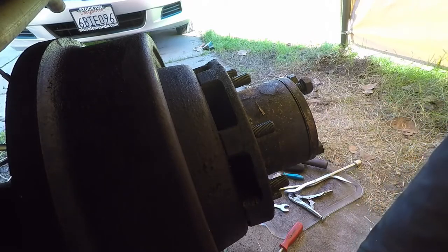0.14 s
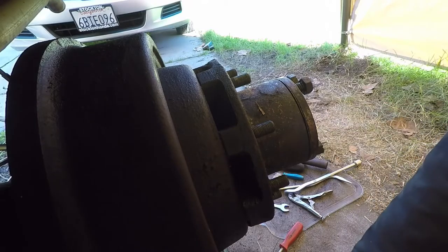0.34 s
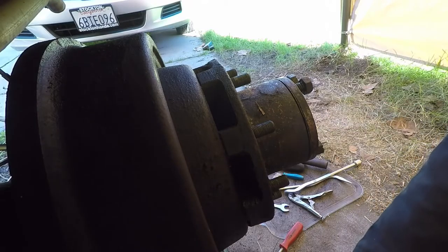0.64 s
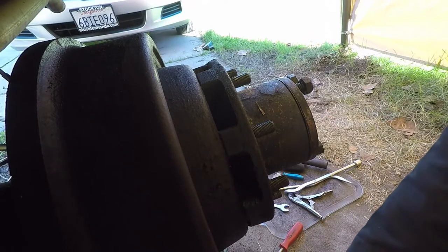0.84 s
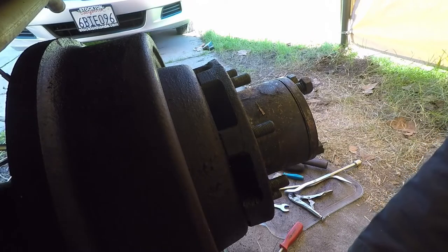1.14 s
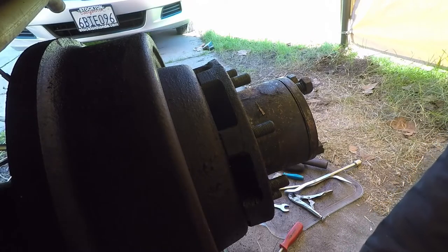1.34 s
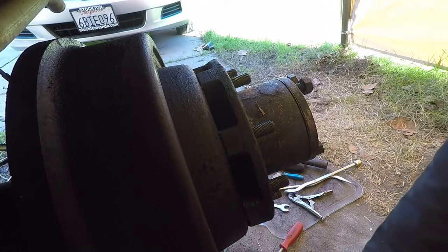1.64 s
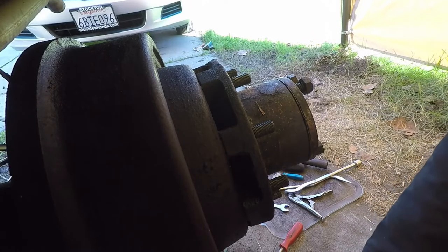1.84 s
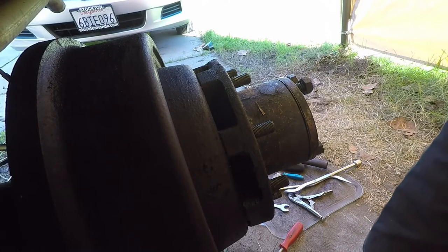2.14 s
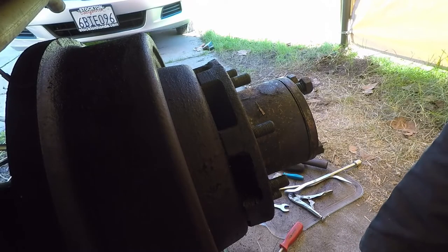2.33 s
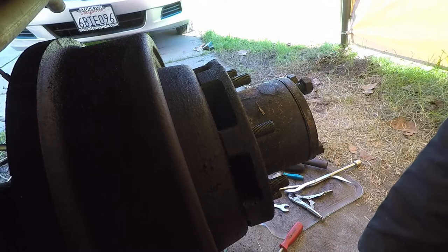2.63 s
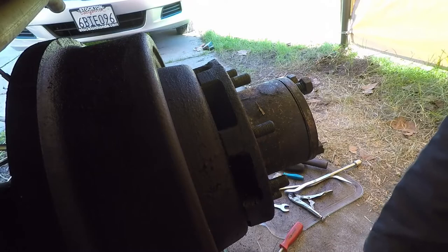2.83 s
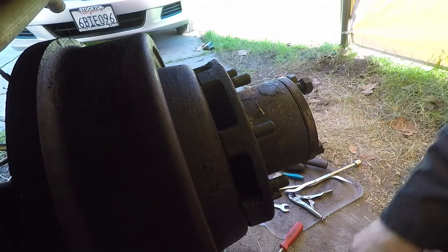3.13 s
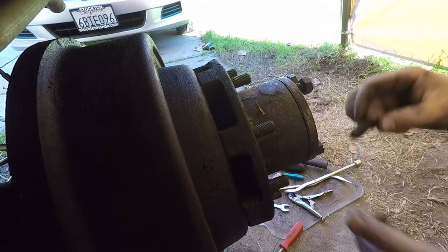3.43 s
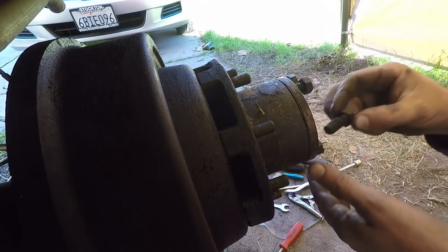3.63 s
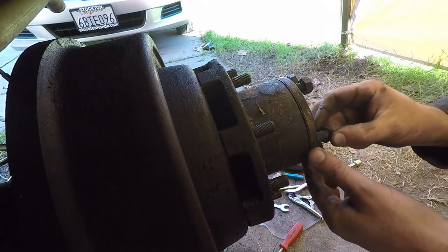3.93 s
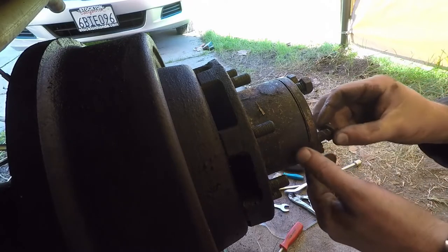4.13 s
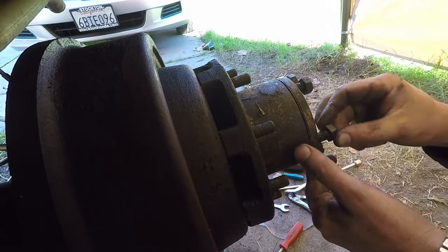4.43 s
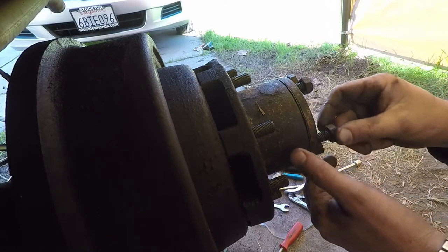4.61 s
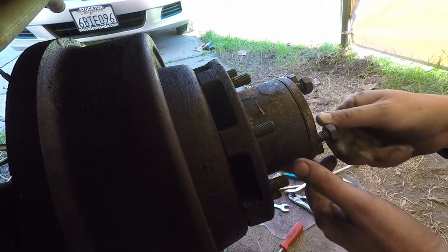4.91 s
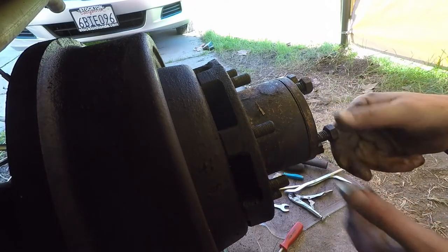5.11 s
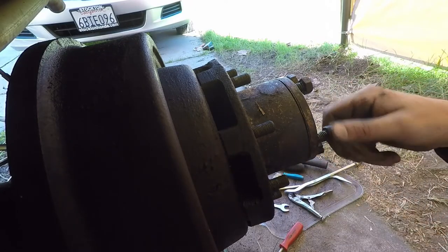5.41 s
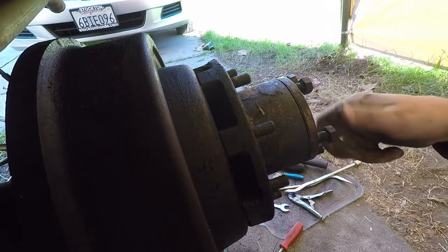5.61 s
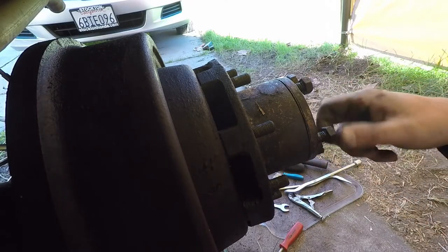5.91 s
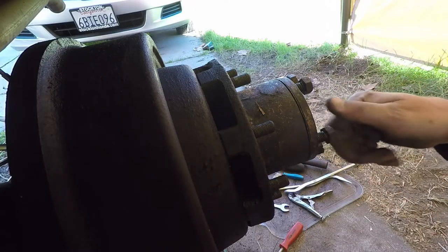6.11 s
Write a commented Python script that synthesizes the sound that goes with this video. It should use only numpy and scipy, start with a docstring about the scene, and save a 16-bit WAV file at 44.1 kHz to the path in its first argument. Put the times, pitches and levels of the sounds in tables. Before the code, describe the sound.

Over soft outdoor air and a steady, slightly rising hiss, small steel parts knock and scrape in a loaded tray, first sparse, then in a quick cluster. A leg jostles the microphone, making muffled low swells and thumps. After a final rattle, a few short, high metallic clinks come from a bolt on an axle, followed by barely audible threading and small ticks. Close, centred and nearly dry.

```python
"""Nuts and bolts in a tray

Steel parts are picked out of a tray beside a camera: ringing modes knock, and showers of tiny slips scrape.
A leg jostles the camera mount, heard as swelling low noise and damped low thuds.
Then a bolt clinks against a truck axle's hub, as short detuned rings, and is started by hand in its thread,
as soft noise. Shaped noise and a thin whine make the air and steady hiss of an open, quiet workshop.
"""
import sys
import numpy as np
from scipy import signal
from scipy.fft import rfft, irfft, next_fast_len
from scipy.io import wavfile
from scipy.ndimage import map_coordinates

SR = 44100
rng = np.random.default_rng(int(sys.argv[2]) if len(sys.argv) > 2 else 0)


def generate_wav(signal):
    """Clip the signal to [-1, 1] and save it as 16-bit WAV at the path in sys.argv[1]."""
    frames = np.transpose(np.atleast_2d(signal))
    scaled = np.clip(frames, -1, 1) * 32767
    pcm = np.round(scaled).astype(np.int16)
    wavfile.write(sys.argv[1], SR, pcm)


N = 276066
T = np.arange(SR // 3) / SR  # seconds within one hit
NOW = np.arange(N) / SR  # seconds within the whole scene


def amp(db):
    """Decibels to gain."""
    return 10 ** (np.asarray(db) / 20)


def unit(x):
    """Scale to rms 1."""
    return x / np.sqrt(np.mean(x ** 2) + 1e-20)


def along(points, hz):
    """Read (Hz, value) points on a logarithmic frequency axis."""
    knot_hz, values = np.transpose(points)
    return np.interp(np.log(hz + 1), np.log(knot_hz + 1), values)


def level(rows):
    """Draw (start_s, level_db) rows as one gain per sample."""
    return amp(np.interp(NOW, *np.transpose(rows)))


def wobble(rate, size=N):
    """A smooth random curve with rate knots a second."""
    knots = rng.standard_normal(int(size * rate / SR) + 4)
    return map_coordinates(knots, [np.arange(size) * rate / SR])


def filtered(x, response):
    """Shape the spectrum of x with a gain that depends on frequency."""
    n = x.shape[-1]
    m = next_fast_len(n + 8192)
    gain = response(np.fft.rfftfreq(m, 1 / SR))
    return irfft(rfft(x, m) * gain, m)[..., :n]


def noise(spectrum, size):
    """Coloured noise of rms 1."""
    return unit(filtered(rng.standard_normal(size), lambda hz: amp(along(spectrum, hz))))


def dull(x, top_hz):
    """Roll off what lies above top_hz."""
    return signal.sosfilt(signal.butter(3, top_hz, fs=SR, output="sos"), x)


def fade(t60_s):
    """Exponential decay of 60 dB in t60_s."""
    return np.exp(-np.log(1000) * T / max(t60_s, 1e-4))


def ring(modes):
    """Damped sines (pitch_hz, level_db, t60_s), each struck with a random strength and phase."""
    out = np.zeros(len(T))
    for hz, db, t60_s in modes:
        strength = amp(db + 2 * rng.normal())
        out += strength * fade(t60_s) * np.sin(2 * np.pi * (hz * T + rng.random()))
    return out


def add(track, start_s, sound):
    """Mix a sound into a track at start_s."""
    start = round(start_s * SR)
    track[start:start + len(sound)] += sound[:N - start]


# colour of the outdoor air: pitch_hz, density [dB per Hz, relative]
AIR_COLOUR = [(15, -35), (25, 3.5), (48, -10), (113, -7.5), (198, -11), (233, -21.5), (260, -11.5),
              (322, -15), (359, -13), (410, -15.5), (648, -19.5), (2060, -33), (5730, -33.5), (9050, -41.5),
              (15500, -55.5)]
# course of the hiss, before its trim: start_s, level_db
HISS_LEVEL = [(0, -52), (3, -50.5), (6.26, -47)]
# colour of the bright hiss: pitch_hz, density [dB per Hz, relative]
HISS_COLOUR = [(1500, -42), (2500, -7.5), (4000, -4), (5000, 1), (5800, 4.5), (6500, -1.5), (7500, -11),
               (10000, -22.5), (15000, -22.5)]
HISS_TRIM_DB = -3.5


def background():
    """Outdoor air, a bright hiss and a thin electrical whine, with a trace of opposite noise left and right."""
    drift = amp(1.2 * wobble(2.6))
    air = amp(-48.5) * noise(AIR_COLOUR, N) * drift
    hiss = amp(HISS_TRIM_DB) * level(HISS_LEVEL) * noise(HISS_COLOUR, N)
    whine = amp(-75) * np.sin(2 * np.pi * 8629 * NOW)
    side = amp(-74) * noise([(100, 5), (2000, -9.0), (6000, 1.0), (15000, -6.5)], N)
    return air + hiss + whine + np.array([side, -side])


# colour of the rubbing on the mount: pitch_hz, density [dB per Hz, relative]
RUMBLE_COLOUR = [(12, -43), (20, -10), (59, 2.5), (129, -5.5), (215, -14), (248, -20.5), (485, -31.5),
                 (551, -56), (600, -41.5), (780, -65), (1320, -120)]
# a leg shifting against the camera mount: middle_s, half_length_s, level_db, top_hz
LEG_SHIFTS = [(0.876, 0.14, -28, 105), (2.08, .1, -39, 130), (2.38, 0.077, -24.5, 251),
              (2.611, 0.04, -23.5, 250), (2.83, 0.054, -22.5, 150), (3.022, 0.098, -19.5, 305),
              (3.3, 0.082, -33.5, 200), (4.596, 0.41, -41.5, 300)]
# bumps on the mount, before the trim for their damping: start_s, level_db, pitch_hz
MOUNT_BUMPS = [(0.183, -21, 124), (0.252, -24, 110), (2.338, -13, 82), (2.349, -15, 187),
               (2.393, -16.5, 116), (2.491, -15, 155), (3.175, -16, 99), (3.993, -32, 68.6),
               (4.303, -25.5, 80.4), (4.529, -29, 104), (4.756, -25, 91), (4.821, -27, 119),
               (5.326, -31, 81.5)]
REST_DB, RESTLESS_DB = -44, 1.5  # rubbing between shifts, and the random swing of all rubbing
BUMP_TRIM_DB = 15.5


def jostle():
    """Cloth rubs and bumps the camera mount: dull noise swells with each shift; thuds die within a cycle or two."""
    rumble = noise(RUMBLE_COLOUR, N)
    rubbing = amp(REST_DB) * noise(RUMBLE_COLOUR, N)
    for middle_s, half_length_s, db, top_hz in LEG_SHIFTS:
        swell = np.exp(-((NOW - middle_s) / half_length_s) ** 2)
        rubbing += amp(db) * swell * unit(dull(rumble, top_hz))
    out = rubbing * amp(RESTLESS_DB * wobble(15))
    for start_s, db, hz in MOUNT_BUMPS:
        cycles = hz * T
        envelope = (1 - np.exp(-cycles / 0.5)) * np.exp(-cycles / 0.5)
        add(out, start_s, amp(db + BUMP_TRIM_DB) * np.sin(2 * np.pi * cycles) * envelope)
    return out


# modes of the tray with its load, before random detuning: pitch_hz, level_db, t60_s
TRAY_MODES = [(372.8, -8.5, 0.21), (416.8, -1, 0.16), (463, -2, 0.079), (629, -15, 0.18),
              (910, -11.5, 0.058), (954, -12, 0.21), (1036, -16, 0.17), (1160, -23, 0.026),
              (1216, -12.5, 0.081), (1463, -13.5, 0.12), (1647, -14.5, 0.073), (1890, -10.5, 0.055),
              (2432, -13.5, 0.061), (3040, -7, 0.081), (3734, -12, 0.1), (5240, -4, 0.033),
              (5200, -5.5, 0.065), (5690, -0.5, 0.028)]
LOAD_DETUNE = 0.0088  # random spread, as a share of pitch


def loaded_tray():
    """The shifting load retunes the tray's modes each time it is played."""
    return [(hz * (1 + LOAD_DETUNE * rng.normal()), db, t60_s) for hz, db, t60_s in TRAY_MODES]


def arch(length_s):
    """One stroke of the hand, rising and falling within length_s."""
    return np.sqrt(np.abs(np.sin(np.pi * np.clip(T / length_s, 0, 1))))


# parts dragged over the tray: middle_s, length_s, tray_level_db, nut_level_db
DRAGS = [(0.341, 0.05, -52, -72), (0.499, 0.082, -48.5, -62), (1.049, 0.039, -39.5, -44),
         (1.138, 0.046, -37, -66), (1.17, 0.04, -38, -45), (1.81, 0.21, -52.5, -68.5),
         (2.14, 0.046, -51.5, -76), (2.73, 0.032, -42, -46), (3.029, 0.074, -65, -48),
         (3.136, 0.036, -47.5, -53), (3.183, 0.035, -46, -43)]
# modes of a scraped steel part: pitch_hz, level_db, t60_s
NUT_MODES = [(1967, 0, 0.12), (3310, -1.5, 0.038), (4510, -6, 0.083), (5704, 14, 0.041), (5760, -1, 0.025)]
# dense rattle between the tray's modes, also in the knocks: pitch_hz, density [dB per Hz, relative]
RATTLE_COLOUR = [(150, -34), (250, -18), (340, -8.5), (520, 10), (720, -47), (1100, 10), (1500, 6.5),
                 (2200, -15.5), (3000, -6.5), (4300, 9), (6200, -2.5), (7500, -14), (10000, -25.5),
                 (15000, -57)]
SLIPS_PER_S, SLIP_TOP_HZ = 900, 6400  # slips are softer than blows


def slides():
    """Tiny irregular slips ring both the tray and the part that is dragged over it."""
    out = np.zeros(N)
    for middle_s, length_s, tray_db, nut_db in DRAGS:
        happens = rng.random(len(T)) < SLIPS_PER_S / SR
        slips = happens * rng.standard_normal(len(T)) * arch(length_s)
        for modes, db in ((loaded_tray(), tray_db), (NUT_MODES, nut_db)):
            body = ring(modes) + amp(-1.5) * noise(RATTLE_COLOUR, len(T)) * fade(0.0033)
            scrape = dull(signal.fftconvolve(slips, body), SLIP_TOP_HZ)
            loudness = np.std(scrape[:round(length_s * SR)]) + 1e-9
            add(out, middle_s - length_s / 2, amp(db) * scrape / loudness)
    return out


# edges between the floor, wall, clack and steel bands: pitch_hz
BAND_EDGES_HZ = [700, 1750, 4300]


def split(x):
    """Cut a hit into its four bands, from low to high."""
    bands = []
    for hz in BAND_EDGES_HZ:
        bands.append(signal.sosfilt(signal.butter(6, hz, fs=SR, output="sos"), x))
        x = signal.sosfilt(signal.butter(6, hz, "high", fs=SR, output="sos"), x)
    return bands + [x]


# parts knocking in the tray, before the band trims:
# start_s, level_db, floor_over_level_db, wall_over_level_db, struck_spot_pitch_hz
TRAY_KNOCKS = [(0.401, -52, 9.5, 7, 1047), (0.7589, -27.5, -3.5, -2, 1430), (1.0262, -42.5, -1, -9, 1930),
               (1.089, -33, 7, -7, 1895), (1.1523, -21, 9, 0, 1035), (1.2362, -29.5, 13.5, -0.5, 1227),
               (1.2966, -43.5, 7.5, -20, 1890), (1.329, -30, 10, -2, 1040), (1.3641, -41, 4.5, 1.5, 1031),
               (1.9914, -32, -6, 1.5, 1106), (2.343, -40, 7.5, -11.5, 1930), (2.391, -38, 2.5, -12, 914),
               (2.4975, -37, 0.5, -16, 2033), (2.715, -47.5, 16, -9, 1966), (3.1624, -47, 12.5, -14, 1980),
               (3.2123, -40.5, 7.5, -8, 1965)]
FLOOR_TRIM_DB, WALL_TRIM_DB, CLACK_TRIM_DB, STEEL_TRIM_DB = -1, 0, -1, 1
# the floor's thump rises as a blow lands nearer the wall, judged by wall over floor level
FLOOR_HZ, RIM_HZ_PER_DB, RIM_FROM_DB = 397.5, 5.5, -5
RIM_RING, RIM_CLACK = 0.6, 0.12  # nearer the wall, the spot rings and clacks more (dB per dB)
SPOT_DB, SPOT_T60_S = 1, 0.13  # ring of the struck spot
STEEL_HZ, STEEL_SCATTER, STEEL_T60_S = 5780, 0.02, 0.05  # ring of the part, scatter as a share of pitch
RATTLE_DB, RATTLE_T60_S = 1.9, 0.1  # the loose load dies away quickly
TICK_DB, TICK_GROWTH = -30, 0.5  # the contact tick grows more slowly than the ring (dB per dB)


def knocks():
    """Each part rings the tray and itself; where and how hard it lands sets the share of each band."""
    out = np.zeros(N)
    for start_s, db, on_floor_db, on_wall_db, spot_hz in TRAY_KNOCKS:
        rim_db = max(on_wall_db - on_floor_db - RIM_FROM_DB, 0)
        floor_hz = FLOOR_HZ + RIM_HZ_PER_DB * rim_db
        steel_hz = STEEL_HZ * (1 + STEEL_SCATTER * rng.normal())
        spot = (spot_hz, SPOT_DB + RIM_RING * rim_db, SPOT_T60_S)
        spot_and_part = ring([spot, (steel_hz, 0, STEEL_T60_S)])
        chatter = amp(3 * wobble(500, size=len(T)))  # the loose load jumps and settles
        rattle = noise(RATTLE_COLOUR, len(T)) * chatter * amp(RATTLE_DB) * fade(RATTLE_T60_S)
        bands = split(ring(loaded_tray()) + spot_and_part + rattle)
        swell = 1 - np.exp(-(T / 0.004) ** 2)  # the heavy floor takes a moment to get going
        bands[0] = (bands[0] + ring([(floor_hz, 19, 0.028)])) * swell
        shares_db = (on_floor_db + FLOOR_TRIM_DB, on_wall_db + WALL_TRIM_DB,
                     CLACK_TRIM_DB + RIM_CLACK * rim_db, STEEL_TRIM_DB)
        for band, share_db in zip(bands, shares_db):
            loudness = np.std(band[:SR // 50])  # over the first 20 ms
            add(out, start_s, amp(db + share_db) * band / loudness)
        contact = noise(TICK_COLOUR, len(T)) * fade(0.17)
        add(out, start_s, amp(TICK_DB + TICK_GROWTH * db) * contact)
    return out


# dry ticks of grit and thread, before the trim: start_s, level_db
DRY_TICKS = [(0.475, -34), (0.4935, -32.5), (3.676, -31), (5.003, -26), (5.014, -26), (5.6548, -18),
             (5.9325, -30), (6.2008, -34)]
# colour of a tick, also of the contact in a knock: pitch_hz, density [dB per Hz, relative]
TICK_COLOUR = [(500, 1), (1500, -9), (3000, -8), (5800, 9.5), (8000, -4), (15000, -16)]
TICK_TRIM_DB = -10.5


def ticks():
    """Grit and thread crests snap without ringing: noise with a fast decay and a weaker, slower one."""
    out = np.zeros(N)
    for start_s, db in DRY_TICKS:
        decay = fade(0.007) + amp(-9.5) * fade(0.088)
        add(out, start_s, amp(db + TICK_TRIM_DB) * noise(TICK_COLOUR, len(T)) * decay)
    return out


# bolt against the hub, before the trim; a negative choke lets the ring hold up instead:
# start_s, level_db, choke_db, contact_click_db
HUB_CLINKS = [(3.9149, -3.5, 22, -14), (4.1245, -27.5, -2.5, -22), (4.2043, -31, 2, 7),
              (4.366, -41.5, -4, 7), (4.507, -19, 0, 1.5), (4.5615, -25, -4, -15), (4.5705, -4, -0.5, -7.5)]
# modes of the bolt, before the grip detunes them: pitch_hz, level_db, share of RING_S [ratio]
BOLT_MODES = [(2785, -13.5, 1.13), (3510, -21, 0.78), (4460, -9, 0.33), (5250, -5, 2.15), (6024, 3.5, 0.88),
              (6985, -7, 1.27), (9320, -26.5, 1.3)]
# the fingers' grip detunes the bolt: start_s, detune_cents
GRIP_DETUNE = [(3.9, 15.5), (4.4, 24), (4.5, 2.5)]
# colour of steel on steel: pitch_hz, density [dB per Hz, relative]
CLICK_COLOUR = [(400, -6.5), (1500, -13), (2700, 4), (4500, 6.5), (6000, 13), (7200, -23), (9000, -5.5),
                (15000, -41)]
CLINK_TRIM_DB = -8.0
RING_S, CHOKE_S = 0.064, 0.029  # t60 of the free bolt, and of the choking


def clinks():
    """The bolt rings briefly between fingers, whose grip detunes it; pressing on the hub chokes the ring."""
    out = np.zeros(N)
    for start_s, db, choke_db, click_db in HUB_CLINKS:
        ratio = 2 ** (np.interp(start_s, *np.transpose(GRIP_DETUNE)) / 1200)
        tone = ring([(hz * ratio, mode_db, share * RING_S) for hz, mode_db, share in BOLT_MODES])
        choke = amp(-choke_db) + (1 - amp(-choke_db)) * fade(CHOKE_S)
        click = noise(CLICK_COLOUR, len(T)) * (fade(0.01) + amp(-8.0) * fade(0.072))
        attack = 1 - np.exp(-T / 0.00033)
        add(out, start_s, amp(db + CLINK_TRIM_DB) * (tone * choke + amp(click_db) * click) * attack)
    return out


# the bolt turning in its thread, before the random unevenness: start_s, level_db
THREAD_LEVEL = [(5.1, -94), (5.4, -64.5), (5.7, -56), (6.26, -66.5)]


def thread():
    """Fingers and thread rub softly as the bolt is turned in: muffled noise of uneven level."""
    uneven = amp(1.5 * wobble(8))
    rub = noise([(250, -17), (650, 10), (1300, 1), (3000, -17), (10000, -34)], N)
    return level(THREAD_LEVEL) * rub * uneven


# decay of the surroundings: pitch_hz, t60_s
ROOM_DECAY = [(200, 0.27), (1200, 0.13), (6000, 0.14), (14000, 0.023)]


def room(x):
    """A short tail from the axle, the ground and the awning: noise that decays at its own rate in each band."""
    hz, t, grid = signal.stft(rng.standard_normal(SR // 2), SR, nperseg=256)
    decay = np.exp(-np.log(1000) * t / along(ROOM_DECAY, hz)[:, None])
    tail = signal.istft(grid * decay, SR, nperseg=256)[1]
    return signal.fftconvolve(x, tail / np.linalg.norm(tail))[:N]


def scene():
    """All sources sit in the middle, the steel ones with a faint short room, over the background."""
    knocking = slides() + knocks()
    clinking = ticks() + clinks()
    direct = knocking + clinking + jostle() + thread()
    reflected = room(amp(-12.5) * knocking + amp(-17.5) * clinking)
    return direct + reflected + background()


TOP_HZ = 15400  # the camera's band limit


def record(dry):
    """The camera cuts very steeply above its band limit."""
    return filtered(dry, lambda hz: 1 / np.sqrt(1 + (hz / TOP_HZ) ** 160))


dry = scene()
out = record(dry)
generate_wav(out)
```